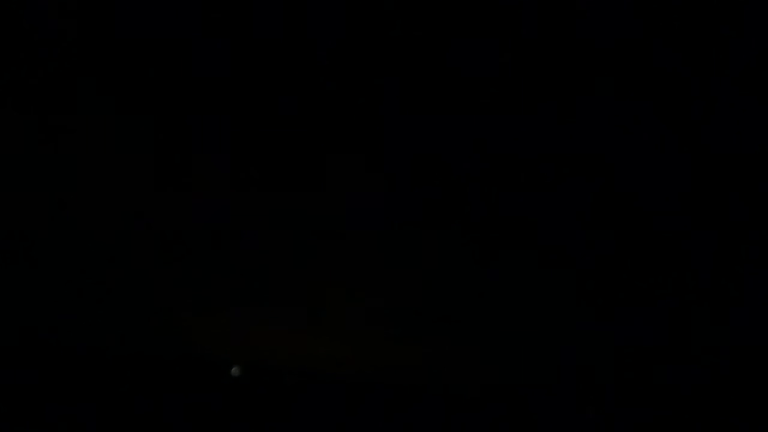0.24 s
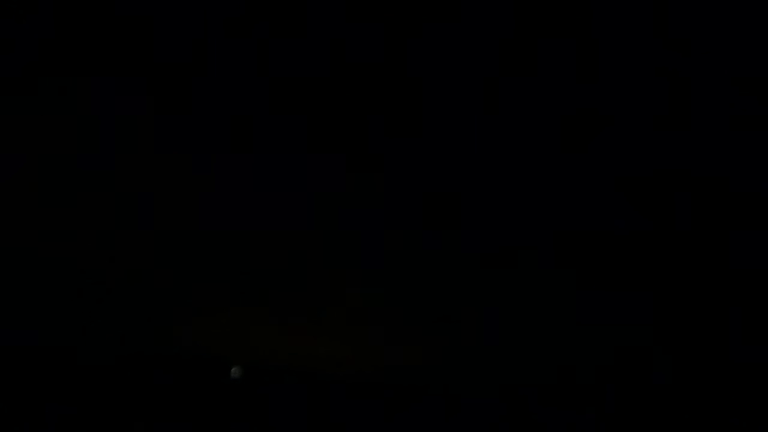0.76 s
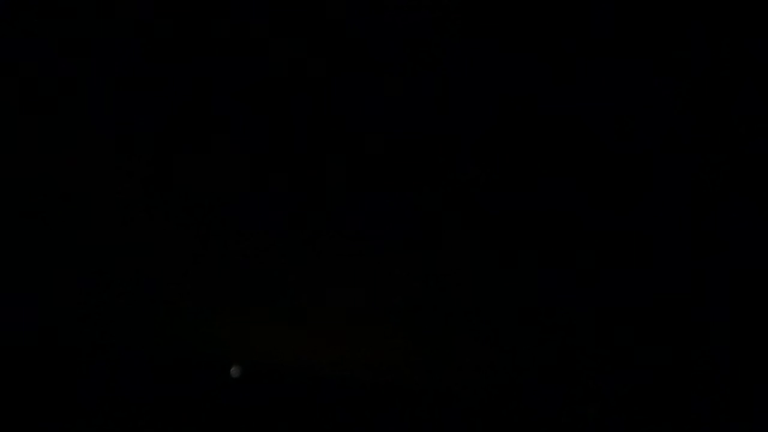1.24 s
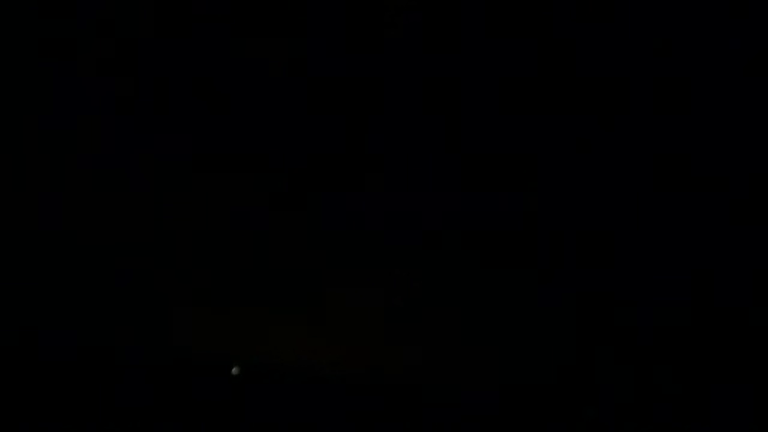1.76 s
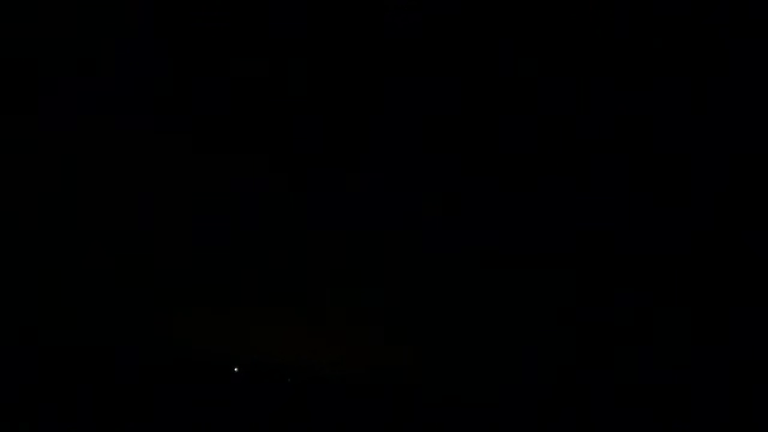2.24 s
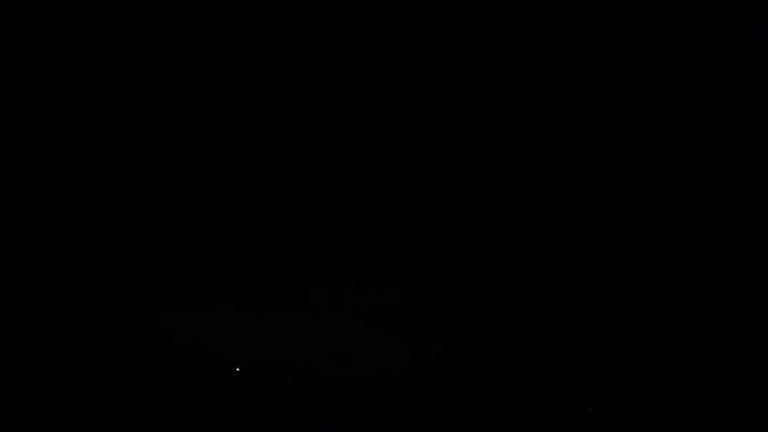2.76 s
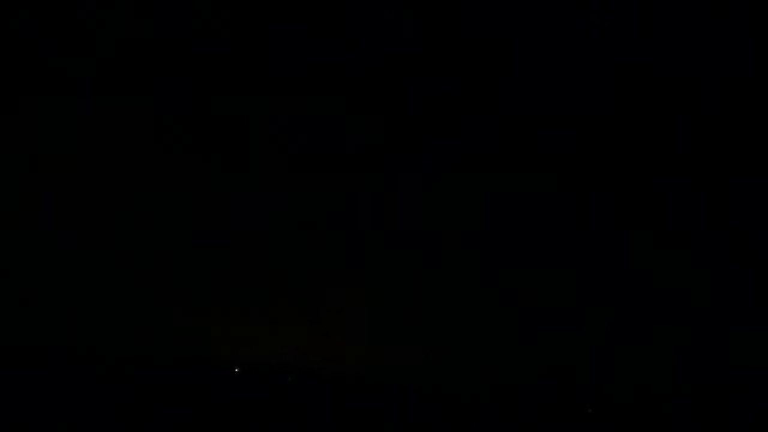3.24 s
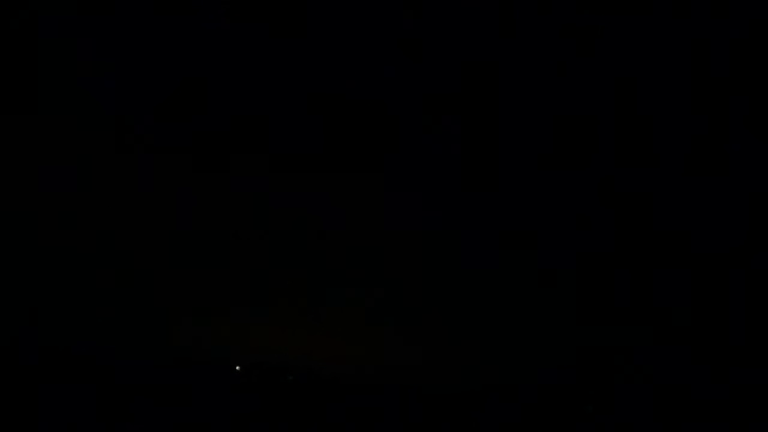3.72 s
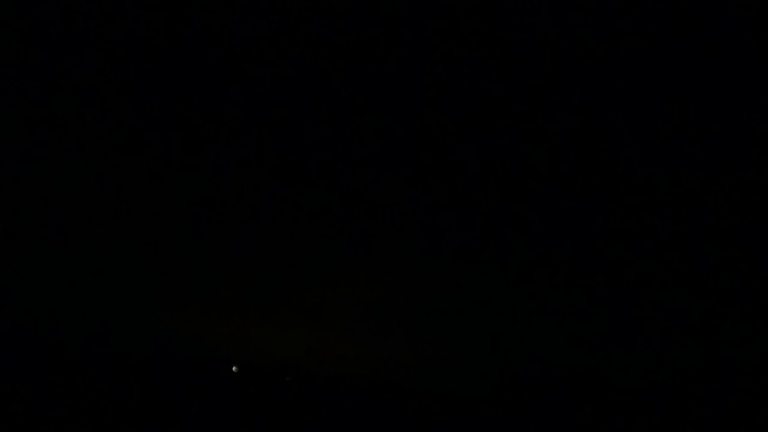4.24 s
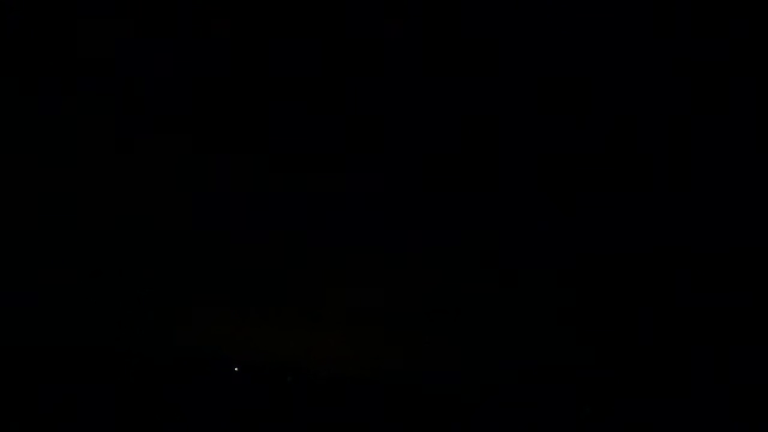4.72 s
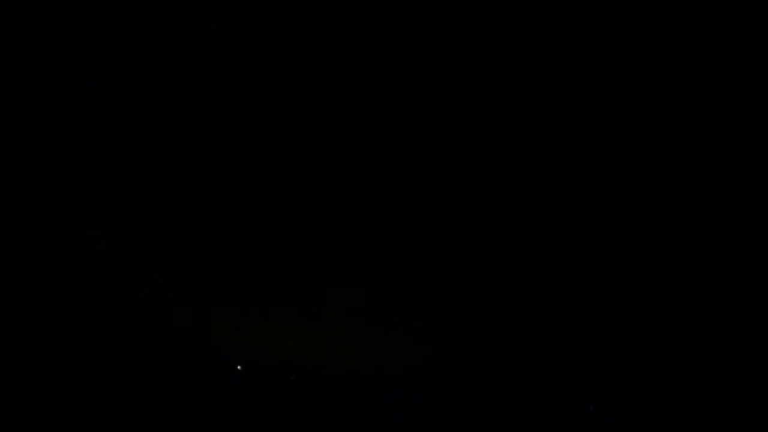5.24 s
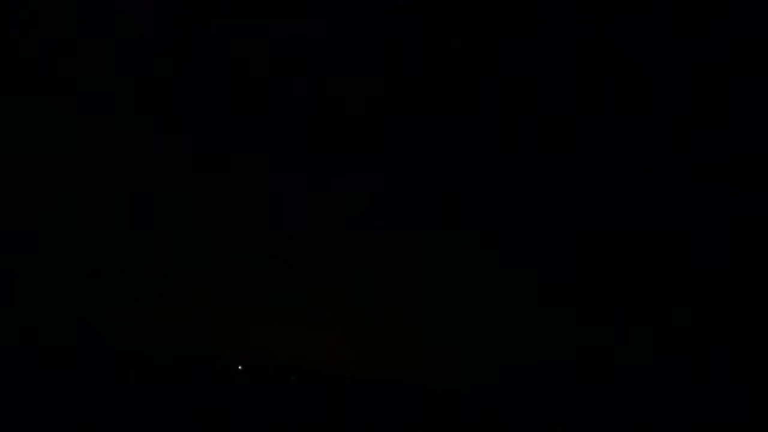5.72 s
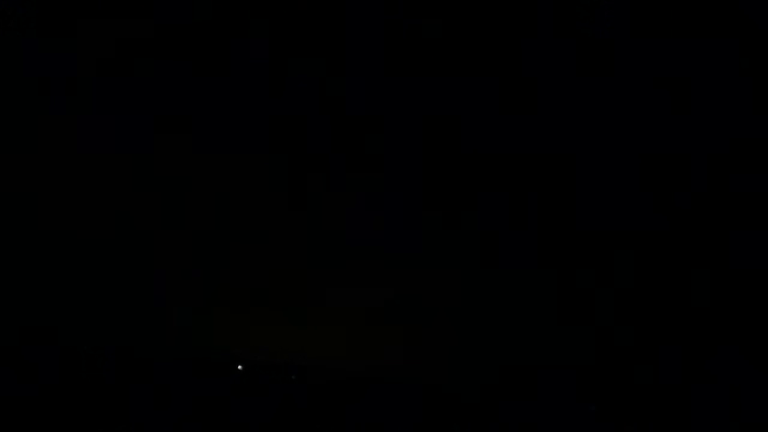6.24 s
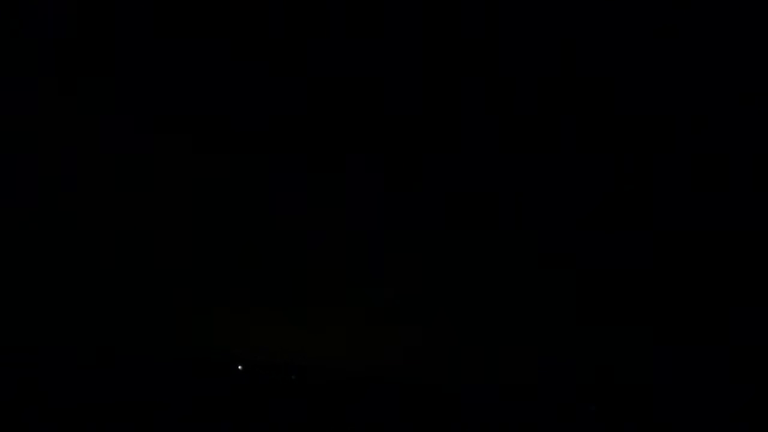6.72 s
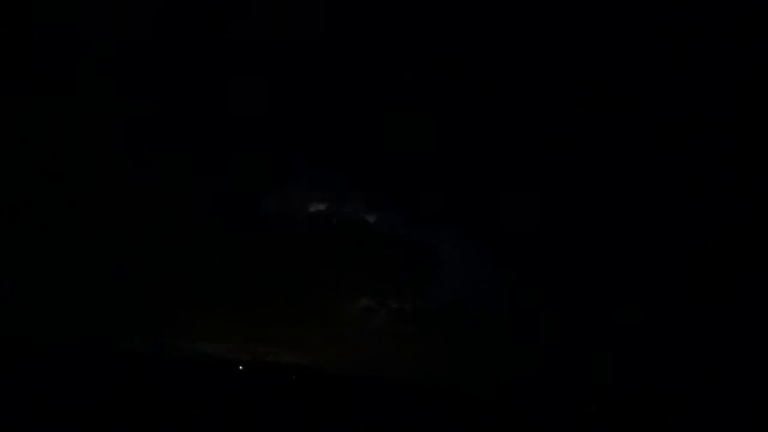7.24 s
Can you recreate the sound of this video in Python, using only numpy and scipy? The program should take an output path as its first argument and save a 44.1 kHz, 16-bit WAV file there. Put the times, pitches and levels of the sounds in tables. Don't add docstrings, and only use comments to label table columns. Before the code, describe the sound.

Steady, bright insect stridulation fills a dark open place, close and nearly central, above a wide blur of distant insects, low night air and fading far traffic. Handling noise sits right at the stereo microphone: tiny ticks, a cluster of hard plastic cracks, dull knocks, a small creak, gritty sliding fingers and a few more separate snaps with short hollow rattles. The last two and a half seconds are mostly undisturbed trilling with faint ticks.

```python
import sys
import numpy as np
from scipy import signal
from scipy.fft import rfft, irfft
from scipy.io import wavfile

SR = 44100
rng = np.random.default_rng(int(sys.argv[2]) if len(sys.argv) > 2 else 0)


def voltage_ratio(decibels):
    exponent = np.asarray(decibels, float) / 20
    return 10 ** exponent


def transcribe(signal):
    frames = np.atleast_2d(signal).T
    limited = np.clip(frames, -1, 1)
    pcm = np.round(limited * 32767).astype(np.int16)
    wavfile.write(sys.argv[1], SR, pcm)


N = 329427


def evened(x):
    return x / np.sqrt(np.mean(x ** 2) + 1e-20)


def add(mix, s, sound):
    part = mix[..., round(s * SR):][..., :sound.shape[-1]]
    part += sound[..., :part.shape[-1]]


def band(x, low_hz, high_hz):
    return signal.sosfilt(signal.butter(2, [low_hz, high_hz], "band", fs=SR, output="sos"), x)


def resonate(x, hz, width):
    r = np.exp(-np.pi * width / SR)
    feedback = [2, -4 * r * np.cos(2 * np.pi * hz / SR), 2 * r * r]
    return signal.lfilter([1 - r * r, 0, r * r - 1], feedback, x)


def wander(per_s):
    points = rng.standard_normal(N // 100)
    return evened(np.interp(np.arange(N) / SR * per_s, np.arange(N // 100), points))


def rasp(times, db, hz, fall_hz, uneven_db):
    tooth = np.arange(-7, 7)
    slip, size, bend, turn = rng.standard_normal((len(times), len(tooth), 4)).transpose(2, 0, 1)
    shift = rng.uniform(-.5, .5, (len(times), 1))
    late = .00213 * (tooth + shift) + .00006 * tooth ** 2 + .00012 * slip
    push = np.exp(-(late / np.where(late < 0, .0068, .0082)) ** 2)
    gain = voltage_ratio(db[:, None] + uneven_db * size) * push
    pitch = hz - fall_hz * np.tanh(late / 0.0061) + 180 * bend

    t = np.arange(-40, 88) / SR
    shape = np.exp(-(t / np.where(t < 0, .00028, .00042)) ** 2)
    phase = 2 * np.pi * (pitch[..., None] * t + turn[..., None])
    tooth_ring = gain[..., None] * shape * np.cos(phase)

    start = np.round((times[:, None] + late) * SR).astype(int)
    at = start[..., None] + np.arange(len(t)) - 40
    inside = (at >= 0) & (at < N)
    return np.bincount(at[inside], tooth_ring[inside], N)


# t/s, lead on the steady beat/strokes, level/dB
SINGER_EFFORT = [(0, -.095, -35.5), (.36, -.125, -37), (0.618, -.18, -34.5), (1.0, -.145, -36),
                 (1.299, -.1, -37.5), (1.598, -.095, -37.8), (2.062, .022, -36), (2.45, .058, -35.5),
                 (2.85, -.002, -34.5), (3.302, -.113, -33.5), (3.8, -.128, -34), (4.152, -.038, -36.5),
                 (4.44, -.1, -37.5), (4.7, -.055, -36.6), (5.3, -0.048, -36.5), (5.698, -.112, -36.5),
                 (6.849, -.108, -36), (7.47, -.08, -35)]
# f/Hz, bandwidth/Hz, level/dB
WING_MODES = [(7840, 220, 4.5), (8450, 170, 3.5), (8830, 220, 5.5), (9240, 200, 1.5)]
STROKES_PER_S = 19.025
SINGER_DB, SINGER_PAN_DB = 5, -1.5


def singer():
    s, lead, effort_db = np.transpose(SINGER_EFFORT)
    times = np.arange(143) / STROKES_PER_S
    jitter = .0003 * rng.standard_normal(len(times))
    times = times - np.interp(times, s, lead) / STROKES_PER_S + .0006 + jitter
    stroke_db = SINGER_DB + np.interp(times, s, effort_db) + .45 * rng.standard_normal(len(times))
    song = rasp(times, stroke_db, hz=8430, fall_hz=450, uneven_db=1.5)
    song = song + sum(voltage_ratio(db) * resonate(song, hz, width) for hz, width, db in WING_MODES)

    t = np.arange(2000) / SR
    leaves = rng.standard_normal((2, len(t))) * voltage_ratio(-60 * t / 0.11) * (t > .001)
    leaves = leaves / np.linalg.norm(leaves[0])
    echo = signal.oaconvolve(song[None], leaves, axes=1)[:, :N]
    return (song + voltage_ratio(-44) * echo) * voltage_ratio([[SINGER_PAN_DB / 2], [-SINGER_PAN_DB / 2]])


# low f/Hz, high f/Hz, share of t60
SHELL_BANDS = [
    (200, 750, 1.6),
    (850, 1750, 1.25),
    (1950, 3700, .95),
    (4700, 10500, .5),
]


def snap(db, body_db, thump_db, crack_db, t60):
    t = np.arange(6000) / SR
    breaks = rng.standard_normal((3, len(t)))
    breaks = breaks[0] + .75 * breaks[1:]
    breaks = breaks + 6.85 * (np.arange(len(t)) == 4)
    sound = 0
    for k, (shell_band, part_db) in enumerate(zip(SHELL_BANDS, (thump_db, body_db, 0, crack_db))):
        low_hz, high_hz, share = shell_band
        fall_db = -60 * t / (share * max(t60, .008))
        rattle = voltage_ratio(-32.5 + fall_db / 10.7)
        part = band(breaks * (voltage_ratio(fall_db) + rattle), low_hz, high_hz)
        part = band(part, .7 * low_hz, 12000)
        sound = sound + (-1) ** k * voltage_ratio(db + part_db) * part / abs(part.mean(0)).max()
    return sound


CHATTER, CHATTER_HZ, STIFF_ABOVE_HZ = .55, 200, 3000


def ring(hz, db, t60):
    t = np.arange(9000) / SR
    noise = rng.standard_normal((2, 2 * len(t)))
    chatter = evened(resonate(noise, hz, min(CHATTER_HZ, hz / 6))[:, len(t):])
    share = CHATTER * (.4 if hz > STIFF_ABOVE_HZ else 1)
    tone = np.sin(2 * np.pi * hz * t) + share * chatter
    return band(voltage_ratio(db - 60 * t / t60) * tone, hz / 1.32, hz * 1.4)


def tap(db, hz, width):
    puff = rng.standard_normal((2, 700)) * np.hanning(700) ** 2
    sound = resonate(resonate(puff[0] + .5 * puff, hz, width), hz, width)
    return voltage_ratio(db) * sound / abs(sound).max()


def rubbed(grit, modes):
    rub = voltage_ratio(-11) * band(grit, 700, 5600)
    rub = rub + sum(voltage_ratio(db + wander(11)) * resonate(grit, hz, width) for hz, width, db in modes)
    low = signal.sosfiltfilt(signal.butter(2, 2600, fs=SR, output="sos"), rub)
    return np.array([evened(low), evened(rub - low)])


# start t/s, length/s, level/dB, change over the slide/dB, treble level/dB
SLIDES = [(1.344, 0.06, -43, -22, -19), (1.973, .028, -52, -8, -4), (2.025, 0.024, -51.5, -16, -1),
          (2.084, 0.022, -61, 9, -4), (2.739, 0.031, -58.5, 26.5, -1.5), (2.772, 0.03, -45, -24, -3),
          (2.87, 0.4, -54.5, 1.5, -2.5), (3.271, .1, -49.5, 0, 2), (3.373, 0.288, -47.5, -3, -6),
          (3.667, 0.13, -46.5, -9.5, -2.5), (3.811, 0.11, -58.5, 9.5, -12), (3.941, 0.135, -52, 5, -7.5),
          (4.073, 0.078, -58, -6, -8), (4.152, 0.028, -44, -31, -10), (4.752, .031, -52.5, -10, -12),
          (4.783, 0.035, -62, 19.5, 5), (4.827, 0.035, -55, -23, 3)]
# f/Hz, bandwidth/Hz, level/dB
LIGHT_GRIP = [(1500, 150, -9.5), (1960, 110, -11.5), (2830, 250, -6), (3620, 150, -9), (4400, 320, -5)]
# f/Hz, bandwidth/Hz, level/dB
FULL_GRIP = [(760, 65, -9), (1183, 71, 1.5), (1500, 250, -2), (1860, 440, -2.5), (2400, 250, -10.5),
             (2780, 280, -7), (3800, 250, -5), (4430, 170, -15)]
GRIP_S = 3.27
TOUCH_S = 0.0052
EASE = 0.079


def slides():
    catches_db = 3.2 * np.minimum(rng.exponential(1, N), 4) * (rng.random(N) < .02)
    grit = rng.standard_normal((3, N)) * voltage_ratio(catches_db + wander(70))
    grit = band(grit[0] + grit[1:], 410, 6000)
    light = np.arange(N) < GRIP_S * SR
    low, high = np.where(light, rubbed(grit, LIGHT_GRIP), rubbed(grit, FULL_GRIP))
    t, out = np.arange(N) / SR, np.zeros((2, N))
    for s, length, db, change_db, treble_db in SLIDES:
        to_edge = np.minimum(t - s, s + length - t)
        touch = np.clip(to_edge / (TOUCH_S + EASE * length) + .5, 0, 1)
        press = voltage_ratio(db - 1.83 + change_db * np.clip((t - s) / length, 0, 1))
        out += touch * press * (low + voltage_ratio(treble_db) * high)
    return out


# body level/dB, thump level/dB,
# crack level/dB
SNAPS = [
    (1.119, -21.5, -19, -36, 7.5),
    (1.2082, -12.5, -8, -18.5, 4.5),
    (1.3269, -13.5, -12, -20, 5),
    (2.7665, -29.5, 2.5, -35, -14),
    (3.648, -14, -4.5, -18.5, -4.5),
    (4.2986, -19, -12, -27, 0.5),
    (4.812, -25.5, 0.5, -22, 5),
]
# t/s, peak level/dB, body level/dB
CREAKS = [(2.7205, -48, 7), (2.7495, -34.5, -5), (2.7745, -39.5, 6.5), (4.071, -45.5, 5.5),
          (4.0977, -38.5, 1.5), (4.1545, -47, -2), (4.797, -41.5, 7), (4.8201, -40.5, 3)]
# t/s, f/Hz, level/dB, t60/s
RINGS = [(1.119, 2900, -28.5, 0.027), (1.119, 3630, -19.5, 0.011), (1.119, 4500, -24, 0.015),
         (1.119, 5600, -33, 0.0093), (1.119, 1160, -42, 0.06), (1.211, 3260, -50, 0.2),
         (1.21, 4800, -47, 0.083), (1.208, 1190, -32, 0.11), (1.209, 730, -31.5, 0.065),
         (1.209, 2350, -36, 0.042), (1.209, 254, -46, 0.28), (1.327, 2372, -26.5, 0.045),
         (1.329, 1315, -39, .1), (1.209, 1720, -39, 0.091), (1.328, 865, -30, .056),
         (1.328, 4840, -44, .057), (3.649, 2200, -25, 0.037), (3.649, 1300, -37, 0.043),
         (3.649, 760, -31, 0.054), (3.649, 4280, -23, 0.018), (3.649, 275, -43, 0.13),
         (3.649, 1890, -38, .03), (4.299, 1890, -24, 0.035), (4.298, 1500, -23, 0.023),
         (4.298, 1180, -25.5, 0.027), (4.299, 4650, -29, 0.017), (4.812, 1475, -22.5, 0.024),
         (2.768, 1480, -27, 0.026), (4.813, 972, -33, 0.038)]
# t/s, peak level/dB, f/Hz
TICKS = [(0.2104, -48, 2680), (0.401, -51, 2850), (0.4808, -48.5, 1720), (0.562, -48, 1610),
         (0.625, -47, 1500), (0.7936, -47.5, 2800), (1.9744, -49, 2910), (2.033, -44, 2610),
         (5.9693, -55, 2990), (6.1684, -52, 1630), (6.1847, -46, 1500), (6.3101, -53, 2870),
         (6.548, -45.5, 2500), (6.67, -49, 3080), (6.908, -51, 1550), (6.958, -51.5, 2750),
         (6.19, -52, 3560), (6.552, -55, 4450), (6.661, -55, 1450), (7.1497, -44.5, 2810)]
# t/s, peak level/dB, f/Hz
KNOCKS = [(1.422, -47, 560), (1.512, -42.5, 516), (1.79, -43, 468), (1.823, -49, 410)]
SNAP_T60, THIN_T60, THIN_BELOW_DB = 0.022, 0.02, -15
CREAK_THUMP_DB, CREAK_CRACK_DB, CREAK_T60 = -5, -11, 0.037


def hand():
    out = slides()
    for s, db, body_db, thump_db, crack_db in SNAPS:
        t60 = THIN_T60 if body_db < THIN_BELOW_DB else SNAP_T60
        add(out, s, snap(db, body_db, thump_db, crack_db, t60))
    for s, db, body_db in CREAKS:
        add(out, s, snap(db, body_db, CREAK_THUMP_DB, CREAK_CRACK_DB, CREAK_T60))
    for s, *part in RINGS:
        add(out, s, ring(*part))
    for s, db, hz in TICKS:
        add(out, s - .004, tap(db - 0.5, hz, width=630) + tap(db - 7, 1.72 * hz, width=1300))
    for s, db, hz in KNOCKS:
        add(out, s - .004, tap(db, hz, width=240))
    return out


def read(points, hz):
    f, value = np.transpose(points)
    return np.interp(np.log(hz + 1), np.log(f + 1), value, left=-90, right=-90)


def colour(x, points, db):
    gain = voltage_ratio(read(points, np.fft.rfftfreq(N, 1 / SR)))
    return voltage_ratio(db) * evened(irfft(rfft(x) * gain, N))


# f/Hz, spectral level/dB per Hz
CHORUS_MID = [(3290, -40), (5600, -24), (6350, -18), (7030, -6.5), (7570, 0.5), (7920, -3.5), (9030, -1),
              (10100, -4.5), (11000, -10.5), (14400, -37), (22000, -120)]
# f/Hz, spectral level/dB per Hz
CHORUS_SIDE = [(3290, -51), (5600, -28), (6420, -23), (7300, -2), (7700, -4), (9590, -10), (11000, -19),
               (14400, -50), (22000, -120)]
CHORUS_MID_DB, CHORUS_SIDE_DB = -42, -49.5


def chorus():
    both = []
    for points, db in ((CHORUS_MID, CHORUS_MID_DB), (CHORUS_SIDE, CHORUS_SIDE_DB)):
        kin = np.zeros(N)
        for hz in np.linspace(6800, 10800, 9):
            times = np.cumsum(rng.uniform(.03, .055, 260))
            stroke_db = 1.46 * rng.standard_normal(len(times))
            kin += rasp(times, stroke_db, hz=hz, fall_hz=500, uneven_db=2)
        both.append(colour(0.52 * evened(kin) + rng.standard_normal(N), points, db))
    mid, side = both
    return np.array([mid + side, mid - side]) * voltage_ratio([[-.7], [.7]])


# f/Hz, spectral level/dB per Hz
AIR_MID = [(15, -45), (25, -23), (54, -1), (111, 0), (150, -3), (308, -2), (372, -2.5), (398, -7),
           (437, -8), (713, -9), (764, -9), (4800, -19.5), (6500, -21), (8450, -16.5), (14300, -120)]
# f/Hz, spectral level/dB per Hz
AIR_SIDE = [(15, -41), (25, -19), (116, -5.5), (239, -3), (408, -1.5), (491, 0), (1430, -2.5), (2230, -5),
            (4920, -14), (6500, -5), (8450, -41), (14300, -120)]
# low f/Hz, high f/Hz, starting lift/dB, gone at t/s
TRAFFIC = [(130, 450, 3, 6.2), (458, 560, 3, 2.2), (680, 840, 4, 2)]
# t/s, level/dB
HUM = [(0, -69), (1.3, -66), (1.5, -62.5), (3.3, -66.5), (4.6, -67), (5.4, -77), (6.3, -63), (7.47, -80)]
AIR_MID_DB, AIR_SIDE_DB, HUM_HZ = -56.5, -61, 404.7


def air():
    t = np.arange(N) / SR
    mid = colour(rng.standard_normal(N), AIR_MID, AIR_MID_DB)
    side = colour(rng.standard_normal(N), AIR_SIDE, AIR_SIDE_DB)
    hush = np.array([mid + side, mid - side])
    out = hush
    for low_hz, high_hz, lift_db, gone_s in TRAFFIC:
        sections = signal.butter(1, [low_hz, high_hz], "band", fs=SR, output="sos")
        part = signal.sosfiltfilt(sections, hush)
        swell_db = lift_db * np.maximum(1 - (t / gone_s) ** 2, 0) + 0.82 * wander(2.71)
        out = out + part * (voltage_ratio(swell_db) - 1)
    hum = np.sin(2 * np.pi * np.cumsum(HUM_HZ + 1.485 * wander(7.3)) / SR)
    hum_db = np.interp(t, *np.transpose(HUM)) - wander(10)
    return out * voltage_ratio(0.22 * wander(12)) + voltage_ratio(hum_db) * hum


def scene():
    return singer() + chorus() + air() + hand()


def band_limit(x):
    return signal.sosfilt(signal.butter(12, 11830, fs=SR, output="sos"), x)


def record(dry):
    lowpass = signal.firwin(1601, 11020, window=("kaiser", 8), fs=SR)
    mix = signal.oaconvolve(dry, lowpass[None], "same")
    return band_limit(mix)


dry = scene()
out = record(dry)
transcribe(out)
```